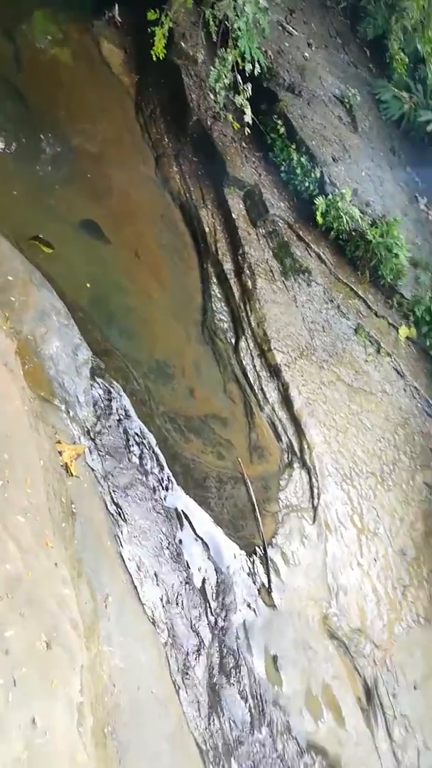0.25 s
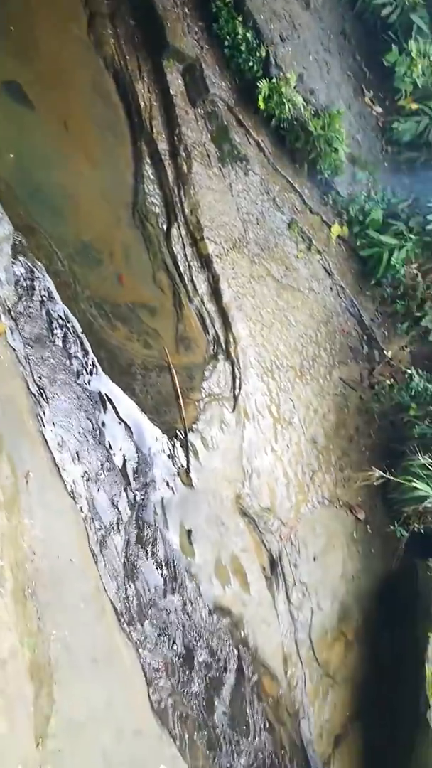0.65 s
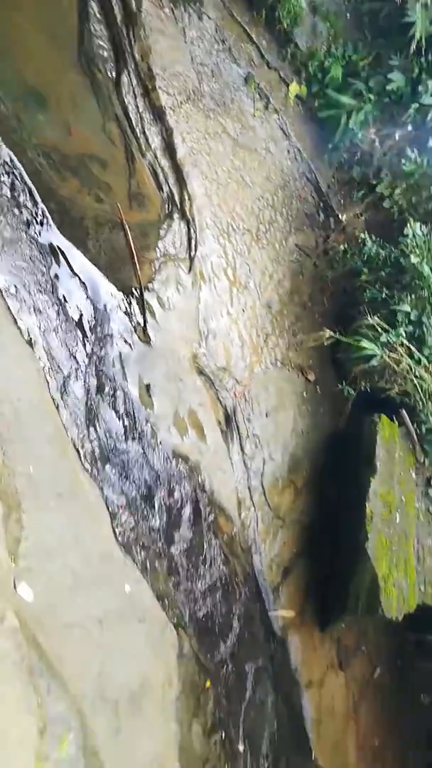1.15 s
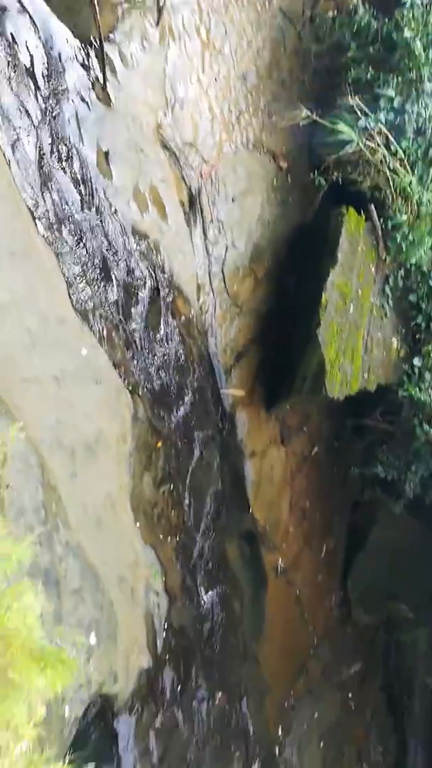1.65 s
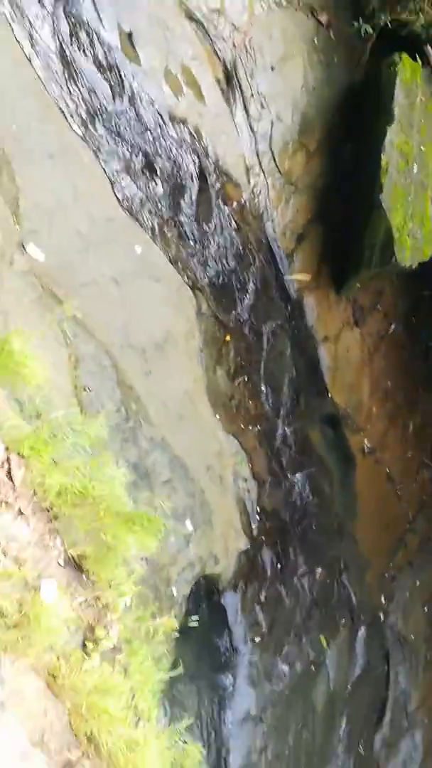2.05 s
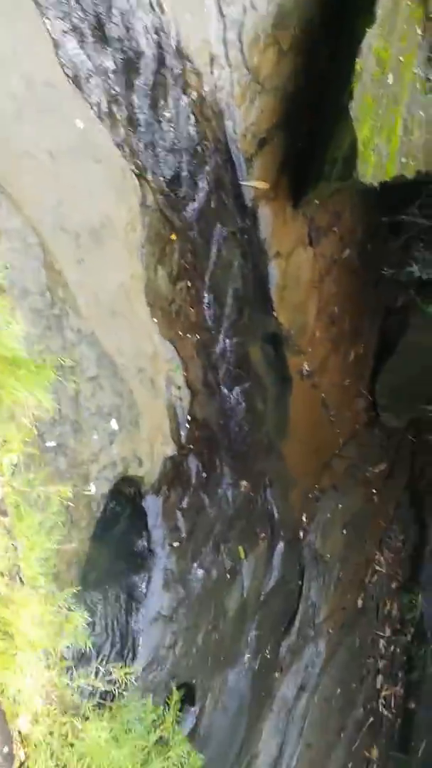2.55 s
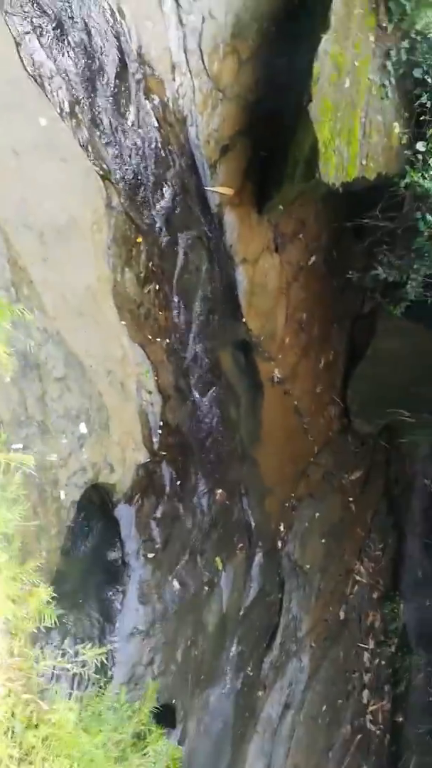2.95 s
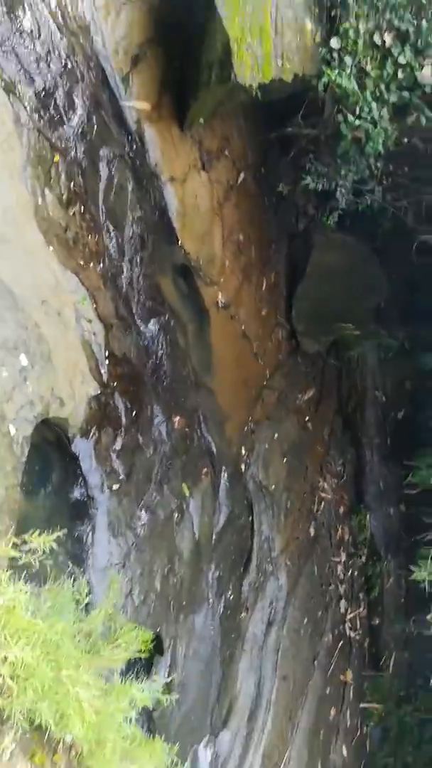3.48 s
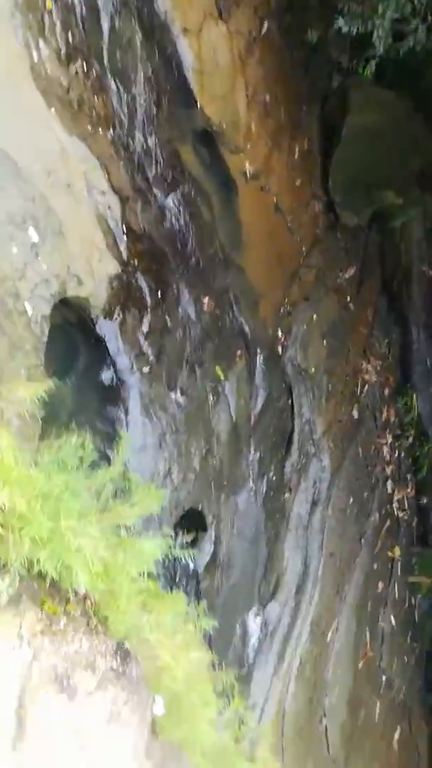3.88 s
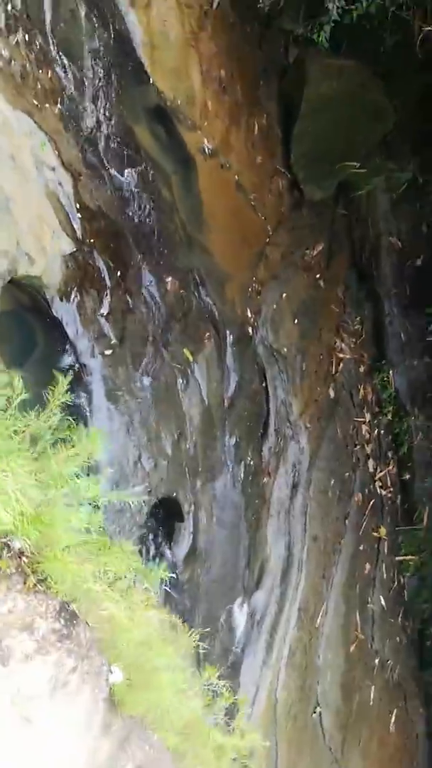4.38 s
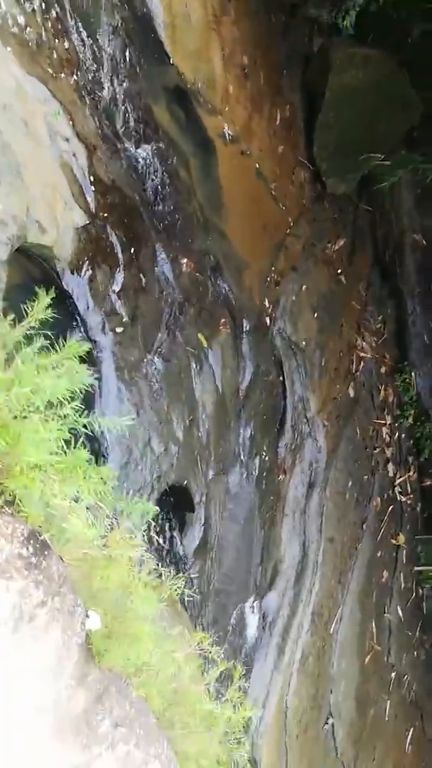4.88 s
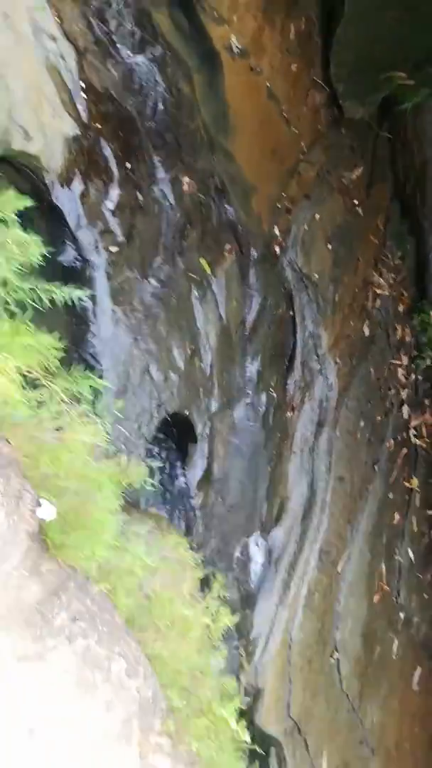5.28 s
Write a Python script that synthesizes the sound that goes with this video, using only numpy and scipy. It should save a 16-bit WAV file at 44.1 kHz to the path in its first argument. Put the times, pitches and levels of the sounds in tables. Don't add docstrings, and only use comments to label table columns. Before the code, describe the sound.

A small stream starts faint under low rumble and a distant motor, then swells into bright rushing water with ticking drops on rock.

```python
import sys
import numpy as np
from scipy import signal
from scipy.fft import rfft, irfft, next_fast_len
from scipy.io import wavfile
from scipy.ndimage import uniform_filter1d, map_coordinates

SR = 44100
rng = np.random.default_rng(int(sys.argv[2]) if len(sys.argv) > 2 else 0)


def file_out(sig):
    cols = np.atleast_2d(sig).T
    lim = np.clip(cols, -1, 1)
    pcm = np.round(lim * 32767).astype(np.int16)
    wavfile.write(sys.argv[1], SR, pcm)


def elevation(decibels):
    levels = np.asarray(decibels, float)
    return 10 ** (levels / 20)


N = 243873

BANDS_HZ = [400, 1700, 4300, 12700]
# time in seconds, delay of the left port in samples,
# likeness of the two ports (0-1), how far the camera faces the chute (0-1).
TURN = [
    (0, 17.5, 0.16, 0),
    (1, 28, 0.2, 0),
    (1.6, 11, 0.18, 0.12),
    (2.4, 4, 0.14, 0.49),
    (2.9, -2, 0.04, 0.88),
    (3.6, -7.5, 0.16, 0.76),
    (5.53, -1.5, 0.24, 0.72),
]
# time in seconds, water level in dB,
# chute left over right in dB, aim of the right port at the spray in dB.
CAMERA = [(0, -56.5, -2.5, -7), (.25, -58.5, -6, -6.5), (.43, -61.5, -7.5, -6.5), (.58, -62, -5, -8),
          (.65, -66.5, -1.5, -6.5), (1.12, -67, -1, -2.5), (1.32, -55, -0.5, -8.5), (1.55, -54, 2.5, -5),
          (1.71, -51.5, 7.5, -2.3), (2.28, -51.5, 5, -1.6), (2.37, -51, 6, 0.5), (2.5, -50.5, 4, -3),
          (2.8, -50, 4, -1.5), (2.92, -50, 3.7, 2), (3.39, -49.5, 3.5, 2.5), (3.75, -48, 2, -0.4),
          (4.3, -48.5, 0.2, -2.2), (5.53, -47.5, 2.5, -1)]


def unit(x):
    return x / np.sqrt(np.mean(x ** 2, axis=-1, keepdims=True) + 1e-20)


def along(points, hz):
    f, v = np.transpose(points)
    return np.interp(np.log(hz + 1), np.log(f + 1), v)


def curves(rows):
    s, *cols = np.transpose(rows)
    return [np.interp(np.arange(N) / SR, s, c) for c in cols]


def wobble(rate):
    knots = rng.standard_normal(int(N * rate / SR) + 4)
    return map_coordinates(knots, [np.arange(N) * rate / SR])


def filtered(x, response):
    m = next_fast_len(N + 8192)
    return irfft(rfft(x, m) * response(np.fft.rfftfreq(m, 1 / SR)), m)[..., :N]


def band(x, colour, low_hz, high_hz, steep=6):
    edge = lambda hz, corner: 1 / np.sqrt(1 + (hz / corner) ** (2 * steep))
    return unit(filtered(x, lambda hz: colour(hz) * edge(hz, high_hz) * edge(low_hz, hz + 1)))


def patchy(depth_db, channels):
    z = signal.stft(rng.standard_normal((channels, N)), nperseg=512)[2]
    field = uniform_filter1d(rng.standard_normal(z.shape), 6, 1)
    field = uniform_filter1d(field, 10, 2)
    patches = z * elevation(depth_db * field / field.std())
    return unit(signal.istft(patches, nperseg=512)[1][:, :N])


def grains(s, hz, cycles, db, rise):
    t = np.arange(400) / SR
    life = t * (hz / cycles)[:, None]
    tone = np.sin(2 * np.pi * hz[:, None] * t * (1 + rise * life))
    ring = tone * life * np.exp(1 - life)
    at = (s * SR).astype(int)[:, None] + np.arange(len(t))
    return np.bincount(at.ravel(), (elevation(db)[:, None] * ring).ravel(), N + SR)[:N]


def swarm(count, mid_hz, spread, cycles, spike_db):
    s = rng.random(count) * N / SR
    loudness = np.minimum(rng.exponential(size=count), 4)
    hz = np.clip(mid_hz * np.exp(spread * rng.standard_normal(count)), 300, .36 * SR)
    return unit(grains(s, hz, cycles, spike_db * loudness, rise=.08))


def swells(rows, order=2):
    t = np.arange(0, N / SR + .004, .002)
    power = 0
    for s, half, db in rows:
        fall_db = 12 * np.minimum(((t - s) / half) ** order, 30)
        power = power + elevation(2 * db - fall_db)
    return np.interp(np.arange(N) / SR, t, np.sqrt(power))


def sides(db, pan_db):
    return 2 * elevation(db) / np.sqrt(1 + elevation(2 * np.array([-pan_db, pan_db])))


def heard(x, low_hz, high_hz, steep=6):
    # frequency in Hz, level in dB per Hz. The camera looks away:
    away = [
        [(400, -7), (550, -5.5), (750, -6), (950, -2), (1250, 1), (1700, -2.5), (2300, -6.5), (2800, -8),
         (3400, -5.5), (4200, -11), (5300, -10.5), (6800, -18), (9000, -23.5), (12000, -40)],
        [(400, 5), (550, -6), (750, -1.5), (950, 3.5), (1250, -1.5), (1700, -11.5), (2300, -19.5), (2800, -17),
         (3400, -19), (4200, -19), (5300, -13), (6800, -7.5), (9000, -6.5), (12000, -9)],
    ]
    toward = [
        [(400, -16), (550, -11), (750, -3), (950, -4), (1250, 2.5), (1700, -1), (2300, -6.5), (2800, -5.5),
         (3400, -2.5), (4200, -4.5), (5300, -2), (6800, -5.5), (9000, -23), (12000, -47)],
        [(400, -10), (550, -17), (750, -2.5), (950, -6), (1250, -0.5), (1700, -4), (2300, -2.5), (2800, -5),
         (3400, -2.5), (4200, -12.5), (5300, -4.5), (6800, -1), (9000, -1), (12000, -7)],
    ]
    ports = lambda pair: lambda hz: elevation([along(points, hz) for points in pair])
    facing = np.clip(curves(TURN)[2], 0, 1)
    turned_away = (1 - facing) * band(x, ports(away), low_hz, high_hz, steep)
    return turned_away + facing * band(x, ports(toward), low_hz, high_hz, steep)


def pool_level():
    water_db, _, aim_db = curves(CAMERA)
    return water_db + 0.71 - 0.3 * aim_db


def spray_aim():
    return np.maximum(curves(CAMERA)[2], -2.5)


def microphone_hiss():
    hiss_db = [
        [-79.5],
        [-72],
    ]
    tilt = lambda hz: elevation([-1.5 * hz / 1000, -.1 * hz / 1000])
    return elevation(hiss_db) * band(rng.standard_normal((2, N)), tilt, 6000, 18000)


def motor():
    # time in seconds, firing rate in Hz.
    revs = [
        (0, 49.06),
        (.2, 48.55),
        (.75, 51.6),
        (1, 51),
        (1.28, 52.14),
        (1.47, 51.35),
        (1.8, 55.08),
        (2.15, 55),
        (3, 59.77),
    ]
    # time in seconds, half length in seconds, level in dB.
    order_swells = [
        [(.27, .12, -54), (.9, 0.37, -58.5), (1.44, 0.24, -43.5), (1.96, 0.18, -46.5), (2.56, 0.097, -49.5),
         (2.9, 0.064, -52)],
        [(.2, 0.136, -46), (.55, 0.19, -49.5), (1.15, .13, -53.5), (1.54, 0.13, -48), (1.93, .17, -49.5),
         (2.17, 0.039, -48.5), (2.72, 0.22, -54)],
        [(.28, 0.23, -56.5), (1.55, .15, -65), (2.6, .15, -53.5), (3.05, 0.1, -54.5)],
        [(.3, .15, -57), (1.52, 0.13, -47), (1.77, 0.16, -47), (2.1, .13, -53.5), (2.85, 0.12, -60)],
    ]
    hz, = curves(revs)
    phase = 2 * np.pi * np.cumsum(hz * (1 + 0.0029 * wobble(8.04))) / SR
    drone = 0
    for k, rows in enumerate(order_swells):
        drone = drone + swells(rows, order=4) * np.sin((k + 1) * phase)
    return elevation(1.5) * drone


def gorge():
    # frequency in Hz, level in dB per Hz.
    deep = [(12, -39), (20, 4), (44, 9), (75, -5.5), (97, 2.5), (150, -6.5), (198, -0.5), (323, -7.5),
            (499, -21), (520, -21), (680, -52), (1140, -120)]
    # frequency in Hz, likeness of left and right.
    deep_alike = [(30, .998), (60, 1), (130, 0.95), (290, 0.9), (400, 0.4), (520, 0.076)]
    # time in seconds, half length in seconds, level in dB.
    gusts = [(.03, 0.08, -45), (.28, 0.14, -51), (1.28, 0.13, -49), (1.63, 0.065, -50), (1.9, .1, -54),
             (2.31, 0.04, -52), (2.86, 0.037, -59), (3.2, .18, -61), (3.82, 0.22, -56), (4.22, .08, -50),
             (4.46, 0.073, -51), (4.83, 0.043, -43.5), (4.93, 0.044, -43), (5.06, 0.05, -46),
             (5.34, 0.17, -49.5)]
    booms = [(.05, .06, -49), (.27, 0.13, -47), (.6, .2, -55.5), (.95, .2, -60), (1.2, 0.064, -53),
             (1.6, 0.091, -48), (1.89, 0.053, -41.5), (2.15, 0.028, -45), (2.29, 0.058, -48),
             (2.71, 0.028, -45.5), (2.861, 0.035, -55), (3.85, .15, -58), (4.35, 0.062, -48),
             (4.76, 0.066, -60), (5.11, .08, -41), (5.5, 0.067, -51)]
    surges = [
        (.02, 0.022, -52.5),
        (2.15, 0.079, -52.5),
        (3.2, 0.1, -47.5),
        (3.852, 0.079, -48),
        (4.9, .07, -47),
        (5.48, 0.067, -49),
    ]
    angle = lambda hz: np.arccos(np.clip(along(deep_alike, hz), -1, 1)) / 2
    mid, side = filtered(patchy(0.93, channels=2), lambda hz: [np.cos(angle(hz)), np.sin(angle(hz))])
    pair = np.array([mid + side, mid - side])
    colour = lambda hz: elevation(along(deep, hz))
    water_db = curves(CAMERA)[0]
    buffet_gain = np.hypot(elevation(water_db - 9.5), swells(gusts))
    boom_gain = np.hypot(elevation(water_db - 7), elevation(-5.5) * swells(booms))
    roar_gain = np.hypot(elevation(pool_level() + 1.5 - 2.5), swells(surges))
    buffet = buffet_gain * band(pair, colour, 16, 76)
    boom = boom_gain * band(pair, colour, 75, 156)
    roar = roar_gain * band(pair, colour, 164, 483, steep=7.1)
    return buffet + boom + roar


def bubbles():
    # start in seconds, peak in dB, pitch in Hz.
    pops = [
        (1.389, -47, 997),
        (1.4994, -45.5, 1030),
        (3.9784, -39.5, 2330),
        (4.0463, -41, 1410),
        (5.4194, -45, 1310),
        (5.4324, -38.5, 2100),
        (5.4535, -38.5, 1160),
    ]
    s, db, hz = np.transpose(pops)
    return grains(s, hz, 3.5, db, rise=.01)


def drops():
    # start in seconds, peak in dB, pitch in Hz. Large drops, then finer spray:
    large = [(1.4834, -47, 5840), (1.897, -50, 5370), (2.1575, -46, 5300), (2.3574, -42, 4590),
             (2.5375, -40, 8300), (2.6228, -37, 8600), (2.7265, -34, 7500), (2.9365, -29, 10010),
             (3.0354, -36, 5530), (3.0628, -26.5, 8450), (3.1122, -32, 9100), (3.4988, -31, 11500),
             (3.5537, -33, 6740), (3.5936, -43, 4740), (3.7273, -31, 6450), (3.7527, -27.5, 9000),
             (3.8392, -22, 5800), (3.924, -34, 6030), (4.0521, -32, 5710), (4.1514, -35, 5510),
             (4.2741, -35.5, 5800), (4.8198, -40, 5700), (4.971, -27, 6100), (5.0039, -30, 6500),
             (5.0458, -42, 5220), (5.1486, -40, 4950), (5.166, -33, 6200), (5.2873, -31, 5740)]
    fine = [(1.4849, -43, 10700), (1.7342, -47, 14960), (1.8097, -56, 10500), (2.113, -39, 9830),
            (2.2921, -44, 10800), (2.902, -38, 13200), (2.9366, -36, 9960), (3.036, -32, 10570),
            (3.0923, -37, 13100), (3.1122, -31, 14700), (3.4988, -33, 11500), (3.5537, -26, 12100),
            (3.5936, -38, 11400), (3.7303, -37, 12200), (3.7518, -39, 9630), (3.8465, -33, 10200),
            (3.9393, -34, 11200), (4.0451, -39, 11300), (4.0521, -33, 12000), (4.1514, -36, 11300),
            (4.2751, -33, 11200), (4.5055, -43, 10900), (4.6078, -41, 11600), (4.8782, -33, 9760),
            (4.9695, -33, 9800), (5.0458, -31, 10400), (5.1291, -40, 10100), (5.3007, -35, 9770),
            (5.427, -39, 10100), (5.5093, -42, 9770)]
    s, db, hz = np.transpose(large)
    tick = grains(s, hz, 2.4, db - 1.5, rise=0)
    tick = tick + grains(s, 1.4 * hz, 3, db - 6, rise=0)
    s, db, hz = np.transpose(fine)
    tick = tick + grains(s, hz, 1.5, db + 2.5, rise=0)
    return elevation([[-30], [.5]]) * tick


def mist(chute, flicker, gurgle_db):
    dimmed = (1 + np.tanh((np.arange(N) / SR - 3.95) / 0.18)) / 2
    mist_db = -9.5 + 2.9 * spray_aim() - 8 * dimmed
    hiss = band(chute, lambda hz: elevation(-.1 * hz / 1000), BANDS_HZ[3], 18000, steep=20)
    return elevation([curves(CAMERA)[0] - 34, gurgle_db + mist_db + 4.0]) * hiss * flicker


def spray(chute, flicker):
    water_db, pan_db, aim_db = curves(CAMERA)
    spray_pan_db = pan_db - 8.5 - 2.5 * spray_aim()
    gains = sides(water_db + aim_db - .5, spray_pan_db)
    return gains * heard(chute, BANDS_HZ[2], BANDS_HZ[3], 20) * flicker


def rush(chute):
    water_db, pan_db, _ = curves(CAMERA)
    return sides(water_db, pan_db) * heard(chute, BANDS_HZ[1], BANDS_HZ[2])


def gurgle(gurgle_db):
    # time in seconds, half length in seconds, level in dB.
    glugs = [
        (.58, 0.036, -63),
        (1.33, 0.088, -71),
        (2.14, 0.06, -51.5),
        (2.75, .05, -51),
        (3.79, .04, -51.5),
        (4.61, 0.022, -50),
        (5.16, 0.029, -48),
        (5.33, .05, -49),
    ]
    lag, alike, _ = curves(TURN)
    alike = np.clip(alike, 0, 1)
    pool = patchy(1.5, channels=1)[0]
    pool = pool + .3 * swarm(count=2500, mid_hz=1200, spread=.45, cycles=3, spike_db=2.5)
    pool = np.array([np.interp(np.arange(N) - lag, np.arange(N), pool), pool])
    water = np.sqrt(alike) * pool + np.sqrt(1 - alike) * patchy(1.0, channels=2)
    water = heard(water, BANDS_HZ[0], BANDS_HZ[1])
    water = water * np.hypot(1, swells(glugs) / elevation(gurgle_db))
    pan_db = np.minimum(curves(CAMERA)[1], 0.2)
    return sides(gurgle_db - 3.0, pan_db) * water


def falling_water():
    fizz = [swarm(count=6000, mid_hz=3500, spread=.5, cycles=2.5, spike_db=2.5) for _ in "lr"]
    crackle = swarm(count=2500, mid_hz=10500, spread=0.28, cycles=2.0, spike_db=0.0)
    return patchy(1.3, channels=2) + .25 * np.array(fizz) + elevation([[-24], [-8]]) * crackle


def stream():
    chute = falling_water()
    flicker = elevation(0.65 * wobble(10) + 0.55 * wobble(20))
    gurgle_db = pool_level() + 0.2 * wobble(9)
    return mist(chute, flicker, gurgle_db) + spray(chute, flicker) + rush(chute) + gurgle(gurgle_db)


def scene():
    return microphone_hiss() + motor() + gorge() + bubbles() + drops() + stream()


def roll_off(x):
    return signal.sosfilt(signal.butter(12, 15850, fs=SR, output="sos"), x)


def record(dry):
    return roll_off(dry)


dry = scene()
out = record(dry)
file_out(out)
```